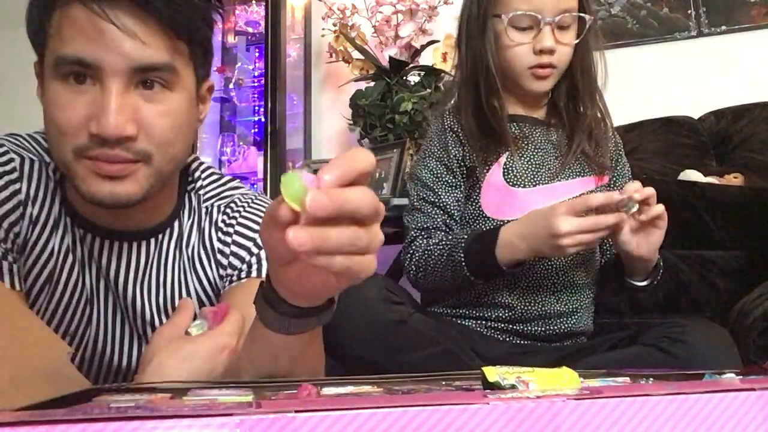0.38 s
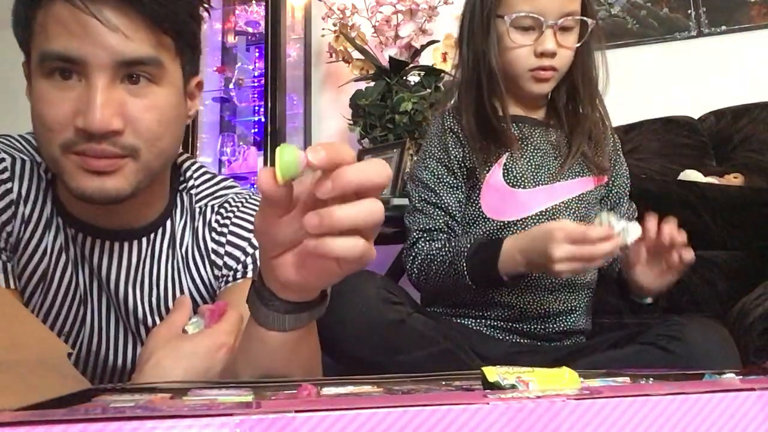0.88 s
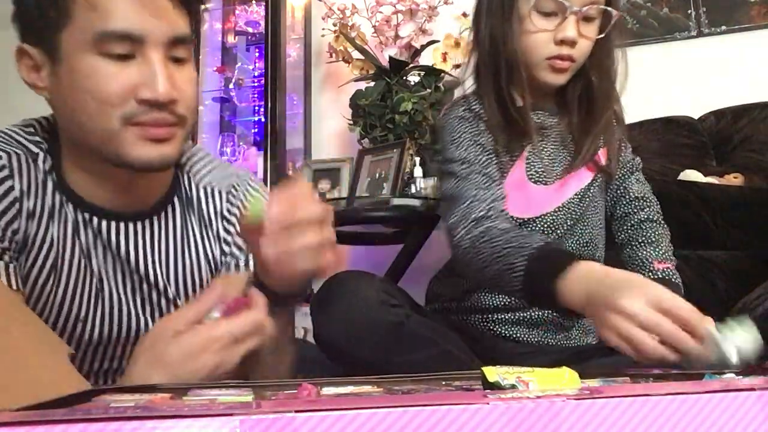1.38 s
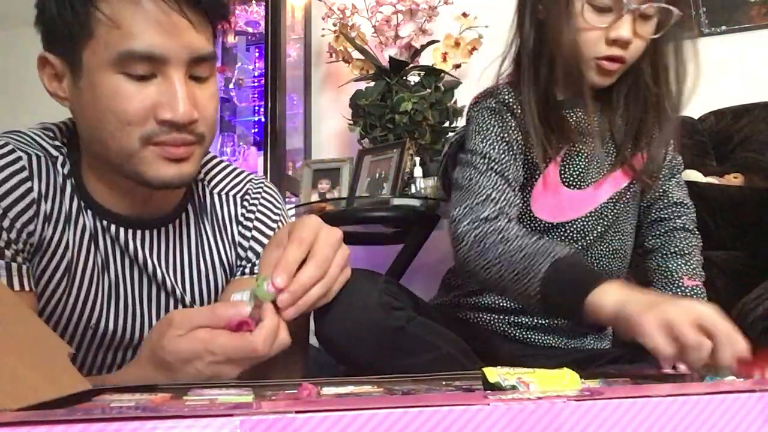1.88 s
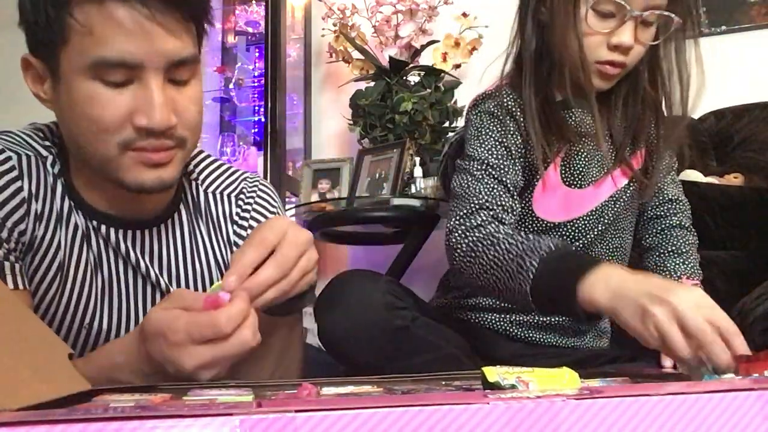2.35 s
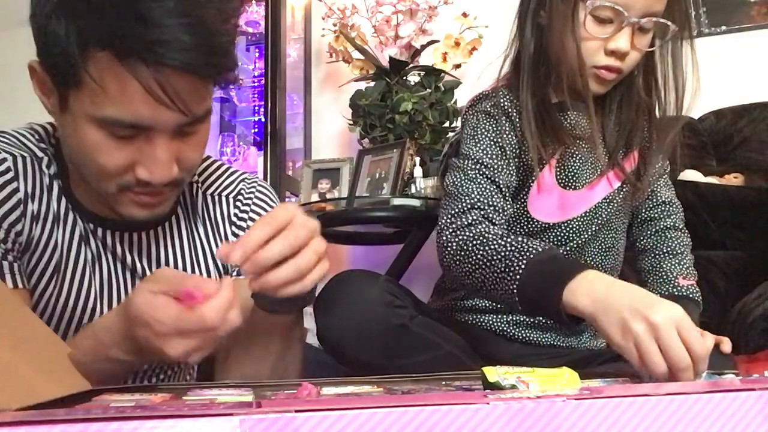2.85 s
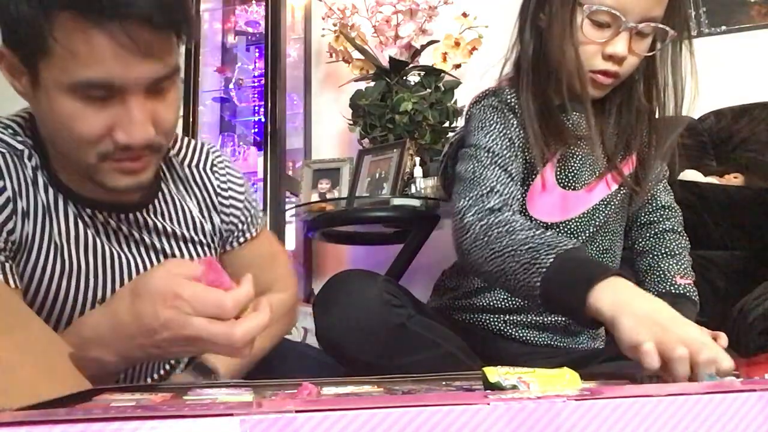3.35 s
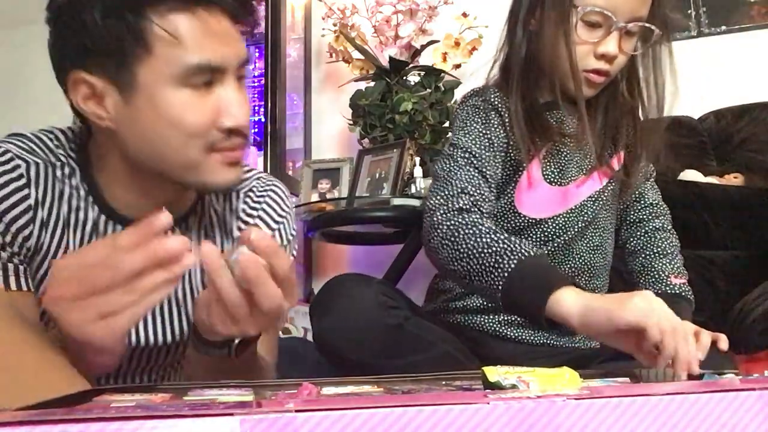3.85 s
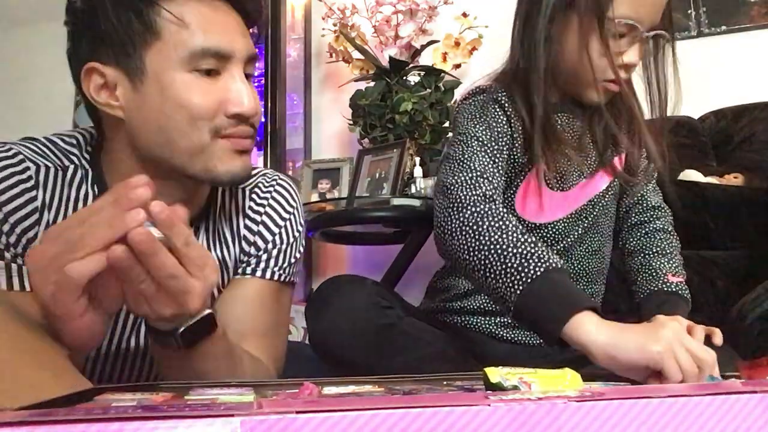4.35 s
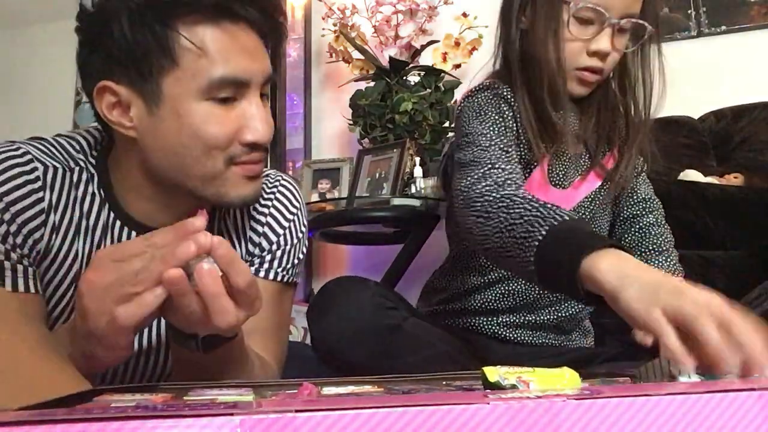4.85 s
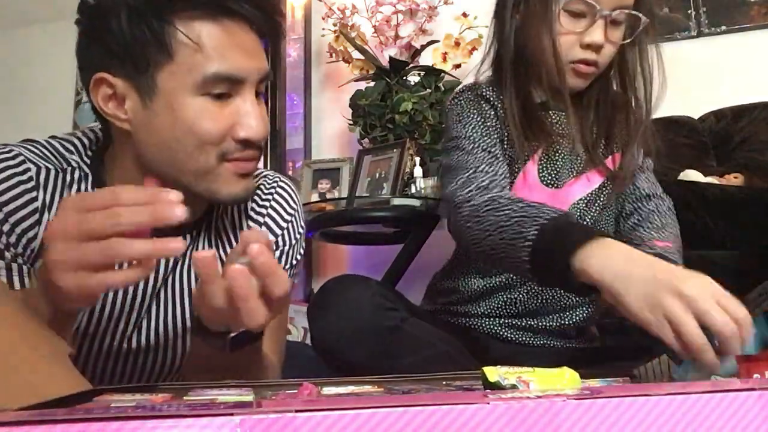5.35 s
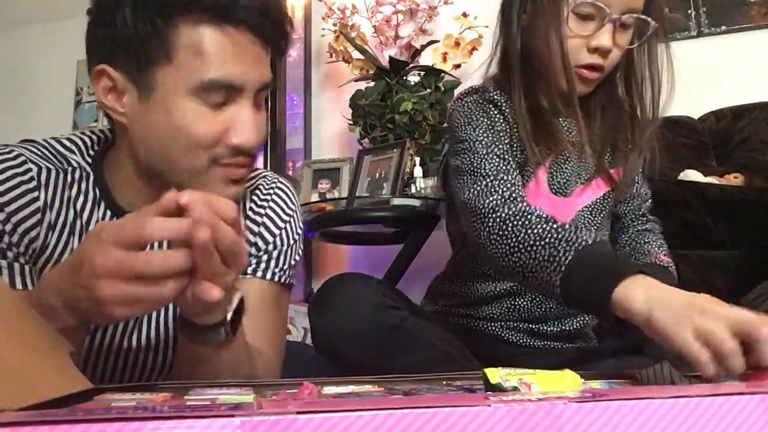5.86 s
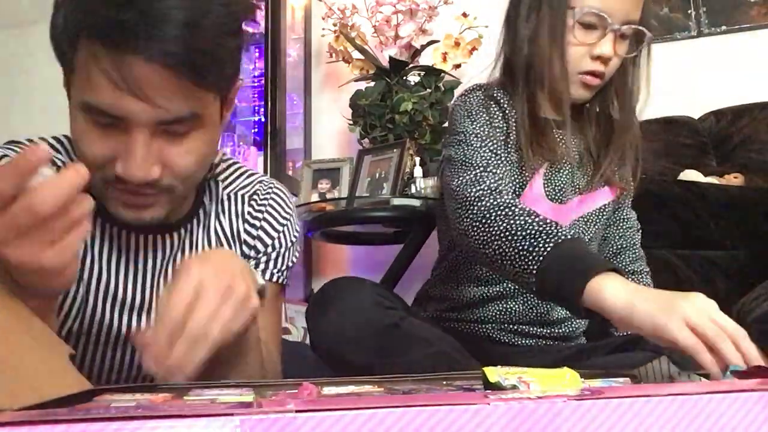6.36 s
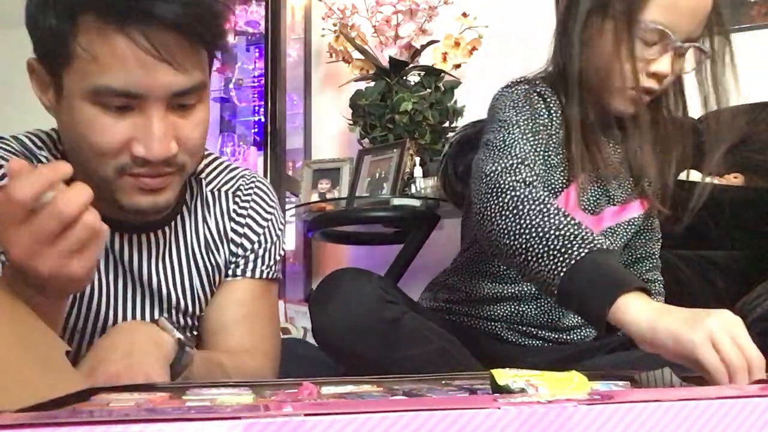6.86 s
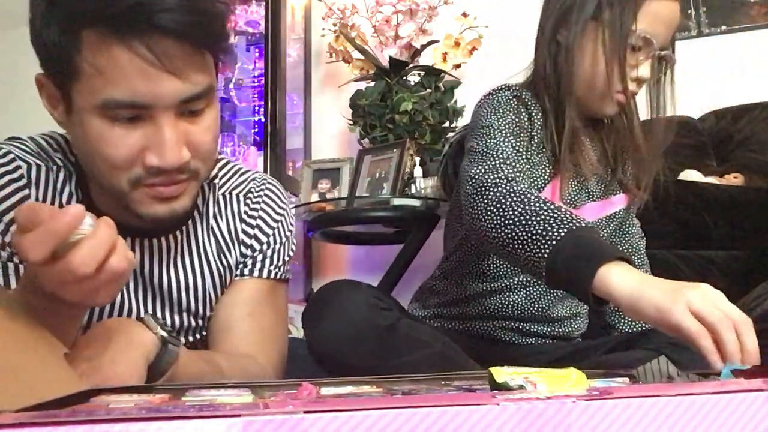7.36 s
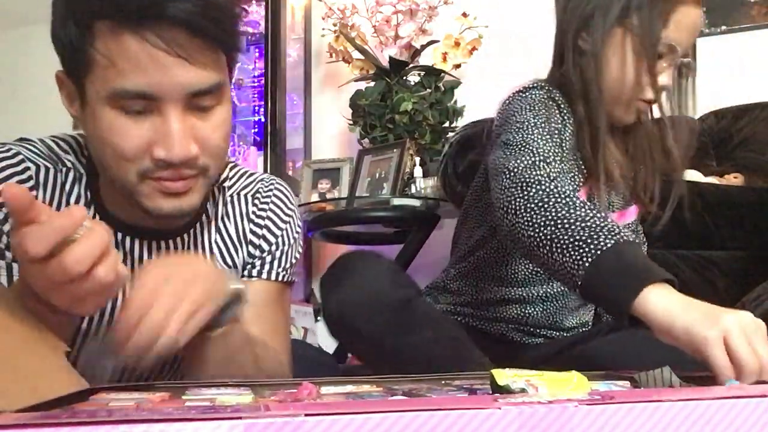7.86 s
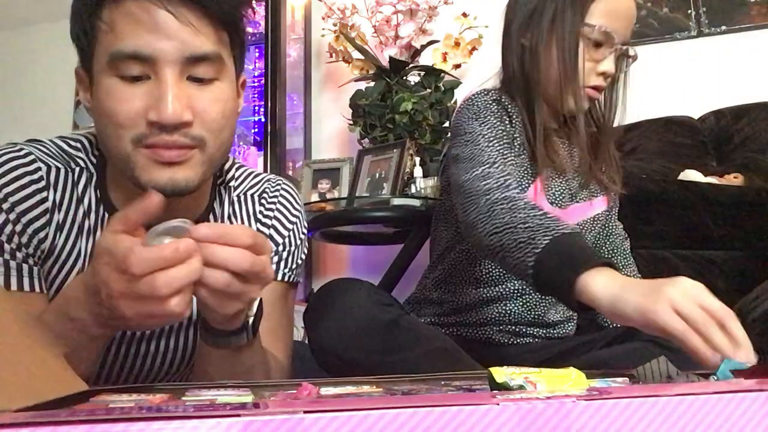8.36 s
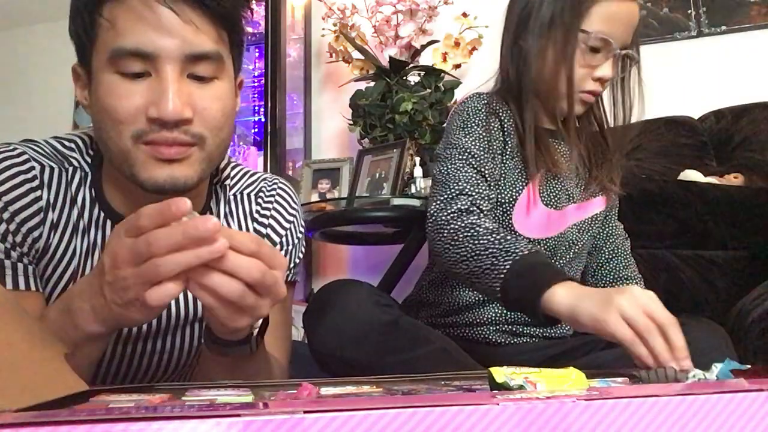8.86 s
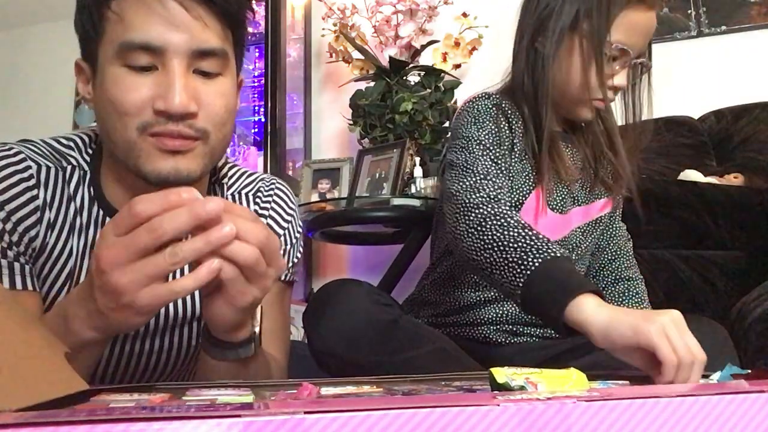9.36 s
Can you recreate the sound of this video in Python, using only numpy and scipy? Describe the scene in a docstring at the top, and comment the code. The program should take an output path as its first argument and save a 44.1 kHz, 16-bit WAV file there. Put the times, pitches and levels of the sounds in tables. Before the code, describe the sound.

Bright film crackle starts sparsely, nearly pauses around one second, then grows into busy snapping and rustling. Fingers bump a thin-walled box, giving low muffled thuds and short rumbling drags. Toward the end there are small gritty plastic scrapes, a quieter gap and final crinkles. Heard close through a modest built-in microphone in a small quiet room.

```python
"""Wrappers rummaged in a thin box

Hands rummage through small foil and plastic wrappers in a thin box, close to a small built-in microphone.
Creases snap one by one as noise bursts under a spectral hump, over a rustle of countless tiny resonant grains.
Touched, the box thumps and rumbles: knocks and small slips drive a bank of modes. Short scrapes are
grainy noise through one gliding resonance. Sparse reflections and steady shaped noise make a quiet room."""
import sys
import numpy as np
from scipy import signal
from scipy.fft import rfft, irfft
from scipy.io import wavfile
from scipy.ndimage import uniform_filter1d

SR = 44100
rng = np.random.default_rng(int(sys.argv[2]) if len(sys.argv) > 2 else 0)


def store_pcm(level_fs):
    """Save levels as 16-bit WAV."""
    pcm = np.round(np.clip(level_fs, -1, 1) * 32767).astype(np.int16)
    wavfile.write(sys.argv[1], SR, np.atleast_2d(pcm).T)


def voltage_ratio(decibels):
    """Convert decibels (scalar or array-like) to amplitude ratios, 20 dB per decade."""
    exponent = np.asarray(decibels, float) / 20
    return 10 ** exponent


N = 417567  # samples


def evened(x):
    """Scales to rms 1."""
    return x / np.sqrt(np.mean(x ** 2) + 1e-20)


def peaked(x):
    """Scales to peak 1."""
    return x / abs(x).max()


def read(points, hz):
    """Reads a spectrum on a log-frequency axis."""
    f, value = np.transpose(points)
    return np.interp(np.log(hz + 1), np.log(f + 1), value)


def add(mix, start_s, sound):
    """Mixes a sound in at start_s, cut at the end of the mix."""
    part = mix[round(start_s * SR):][:len(sound)]
    part += sound[:len(part)]


def causal(gain_db):
    """Minimum-phase response for a gain given from 0 to SR / 2."""
    mirrored_db = np.r_[gain_db, gain_db[-2:0:-1]]
    log_gain = np.log(voltage_ratio(np.maximum(mirrored_db, -100)))
    return np.fft.ifft(np.exp(np.conj(signal.hilbert(log_gain)))).real[:len(gain_db)]


def ring(x, hz, width_hz):
    """A two-pole resonance with gain 1 at its centre."""
    return signal.lfilter(*signal.iirpeak(min(hz, SR / 2.1), hz / width_hz, SR), x)


def stirred(rows, events, after_db, t60_s, stir_bright_db):
    """Level and brightness per sample: the hands' own curve plus a dying stir after each event."""
    row_s, level_db, bright_db = np.transpose(rows)
    t_s, kicks = np.arange(N) / SR, np.zeros(N)
    for start_s, db, *_ in events:
        add(kicks, start_s, voltage_ratio([2 * (db + after_db)]))  # amp of twice the dB is power
    stir = signal.lfilter([1], [1, -voltage_ratio(-2 * 60 / (t60_s * SR))], kicks)
    power = voltage_ratio(2 * np.interp(t_s, row_s, level_db)) + stir
    return 10 * np.log10(power), np.interp(t_s, row_s, bright_db) + stir_bright_db * stir / power


# Film rustle under the hands. Each row: time in seconds, level in dB, brightness in dB per octave.
RUSTLE_CURVE = [(0.0, -56, 1), (0.48, -66.5, -0.5), (1.05, -72.5, 0.5), (1.1, -54.5, 2), (1.17, -49.5, 1.5),
                (1.35, -62, -0.5), (1.55, -54, -4), (2.07, -58.5, -5), (2.3, -53, 0.5), (2.645, -46, 0.5),
                (2.69, -59, 5.5), (2.77, -54.5, -2), (3.08, -52, 3.5), (3.37, -60.5, 1.5), (3.55, -46, 0.5),
                (4.06, -57, -2.5), (4.33, -49.5, -2.5), (5.0, -49.5, 0.5), (5.09, -57, 0.5),
                (5.35, -52.5, 3), (5.375, -61.5, -4), (5.49, -55, -2), (5.54, -47, -6.5), (5.67, -58, -7.5),
                (5.88, -56, -8.5), (6.25, -53.5, -3), (6.44, -72, -11), (6.74, -53, -8), (6.93, -69, -8),
                (6.98, -54, -9), (7.3, -61, -2.5), (7.48, -81, -9.5), (7.79, -63, -4.5), (7.92, -49, -8),
                (8.03, -79, -4), (8.12, -51, -7.5), (8.33, -56, -4.5), (8.45, -67, 1), (8.64, -67, -4.5),
                (8.75, -60, -6), (9.468, -64.5, -8)]


def crumpling():
    """How hard and how bright the film rustles; after a snap it rustles on, duller."""
    return stirred(RUSTLE_CURVE, CREASE_SNAPS, after_db=-25.5, t60_s=0.15, stir_bright_db=-2.5)


# Rustle colour of the film. Each row: frequency in Hz, density in dB per Hz (relative).
FILM_COLOUR = [(850, -18.5), (2000, 2), (3800, 1), (7000, 3.5), (11000, -9), (16000, -12)]


def grains(per_s, spread_db, t60_s, breadth, patchy_db, patches=20):
    """Tiny random creases; each patch of film has its own pitch and is now busier, now stiller."""
    size = voltage_ratio(spread_db * np.minimum(rng.exponential(1, N), 3.5)) * (rng.random(N) < per_s / SR)
    size /= np.sqrt(np.mean(size ** 2) / patches)
    patch = rng.integers(0, patches, N)
    pitches_hz = np.geomspace(850, 15000, patches)
    film = voltage_ratio(read(FILM_COLOUR, pitches_hz)) * np.sqrt(pitches_hz)  # patch width grows with pitch
    level_db, bright_db = crumpling()
    busy = evened(uniform_filter1d(rng.standard_normal((patches, N // 512 + 2)), 5, 1))
    t_s, out = np.arange(512) / SR, np.zeros(N)
    for k, hz in enumerate(pitches_hz):
        at = np.flatnonzero(size * (patch == k))
        busy_db = patchy_db * np.interp(at / 512, np.arange(busy.shape[1]), busy[k])
        rattle = rng.standard_normal(len(t_s)) * voltage_ratio(-60 * t_s / t60_s)
        grain = ring(ring(rattle, hz, breadth * hz), hz, breadth * hz)
        force = np.zeros(N)
        force[at] = size[at] * voltage_ratio(level_db[at] + busy_db + bright_db[at] * np.log2(hz / 4000))
        out += signal.oaconvolve(force, film[k] * grain / np.linalg.norm(grain))[:N]
    return out / np.linalg.norm(film)


def rustle():
    """A dense swish of film sliding on film, wavering fast, and sparser ticks within it."""
    waver = evened(uniform_filter1d(uniform_filter1d(rng.standard_normal(N), 500), 500))
    swish = grains(per_s=3500, spread_db=3.5, t60_s=.005, breadth=.5, patchy_db=5)
    ticks = grains(per_s=600, spread_db=5, t60_s=.005, breadth=.45, patchy_db=4)
    bright_db = crumpling()[1]
    waver_db = (4.5 - 0.4 * bright_db) * waver  # bright foil slides evenly, dull plastic crumples in jerks
    return voltage_ratio(-7.5 + waver_db) * swish + voltage_ratio(-10.0 - 0.033 * bright_db) * ticks


# Modes of the box walls. Each row: frequency in Hz, width in Hz, relative level in dB.
BOX_MODES = [(84.4, 32, -4), (117, 30.5, -1), (165.4, 34.8, 2), (249, 39, 0), (310, 34.5, -0.5),
             (386.4, 110, -0.5), (482, 153, -1), (608, 125, -2.5), (803, 224, -17.5)]


def box(force, weight):
    """The walls ring in their modes, with alternating signs, each driven as weight(hz) says."""
    out = 0
    for k, (hz, width_hz, db) in enumerate(BOX_MODES):
        out = out + (-1) ** k * voltage_ratio(db) * ring(force * weight(hz), hz, width_hz)
    return out


def alike(hz):
    """Weight that drives all modes alike."""
    return 1


# Rubbing on the box. Each row: time in seconds, level in dB, brightness in dB per octave.
RUB_CURVE = [(0.0, -54, 0.9), (0.46, -74, 0), (1.42, -69, -0.5), (1.55, -60, -3.5), (1.92, -54.5, -0.5),
             (2.17, -59, -0.5), (2.67, -66.5, -0.5), (2.82, -47.5, -4), (3.0, -72, 4.5), (3.11, -45, -1.2),
             (3.19, -55, 1), (3.28, -46.5, 0), (3.39, -55.5, 1.5), (3.5, -47, 2), (3.88, -59, -0.5),
             (4.22, -48, 2), (4.31, -58.5, -3.5), (4.4, -55, 4), (5.01, -56, -2.5), (5.08, -76.5, 2),
             (5.36, -74, 3), (5.4, -57, -4), (5.5, -62, -3.5), (5.54, -47, -2.5), (5.75, -63, 1.5),
             (6.07, -59, -0.5), (6.19, -49, 3), (6.38, -61, -1.5), (6.67, -46.5, 0), (6.92, -58, 2.5),
             (6.98, -46, 1), (7.49, -67, -1), (7.61, -47.5, 0), (7.79, -51, 0.5), (8.11, -49.5, 1.5),
             (8.38, -59.5, 0), (8.45, -108, -10), (8.65, -92, 2), (8.7, -62, 0), (9.04, -60.5, 1),
             (9.27, -52.5, 0), (9.468, -57, 1)]


def rubbing(per_s=320, spread_db=3.6, scatter_db_per_octave=2.5, slip_s=.002):
    """Wrappers and fingers drag over the box in small slips, each at another place, duller or brighter."""
    slips = voltage_ratio(spread_db * np.minimum(rng.exponential(1, N), 3)) * (rng.random(N) < per_s / SR)
    place_db = scatter_db_per_octave * np.clip(rng.standard_normal(N), -1.5, 1.5)
    # after a knock the things in the box slide on
    level_db, bright_db = stirred(RUB_CURVE, BOX_KNOCKS, after_db=-11.5, t60_s=0.25, stir_bright_db=-2.5)
    rough = rng.standard_normal(N)

    def spread(x):
        """A slip lasts a moment: decaying noise."""
        return rough * signal.lfilter([1], [1, -np.exp(-1 / (slip_s * SR))], x)

    def mode_force(hz):
        """Slips as one mode feels them."""
        return spread(slips * voltage_ratio(level_db + (bright_db + place_db) * np.log2(hz / 280)))

    sound = box(0.97, mode_force)
    scratch = ring(spread(slips * voltage_ratio(level_db + 2 * bright_db)), 1234, 770)  # dry contact
    sound += voltage_ratio(-13.5) * scratch
    return sound / np.std(box(spread(slips), alike))


# Friction scrapes. Each row: start in seconds, end in seconds, rms level in dB, resonance in Hz,
# width in Hz, glide in octaves.
SCRAPE_STROKES = [(0.0, 0.108, -64, 3250, 500, -0.016), (0.151, 0.29, -62.5, 3300, 500, -0.18),
                  (6.965, 7.04, -44.5, 570, 150, -0.066), (4.869, 5.05, -63, 2120, 300, 0.014),
                  (7.392, 7.463, -74, 11850, 60, -0.18), (8.47, 8.517, -48, 2450, 885, 0.051),
                  (8.525, 8.54, -52.5, 2770, 1200, 0.07), (8.567, 8.579, -56, 2540, 900, 0.017),
                  (8.67, 8.703, -53, 2000, 1300, 0.05), (8.68, 8.754, -55.5, 132, 50, -0.064),
                  (8.859, 8.905, -52.5, 563, 90, -0.023)]


def scrapes():
    """A fingertip on a small plastic shell, or shell on box: grainy friction through one gliding resonance."""
    out = np.zeros(N)
    for start_s, end_s, db, hz, width_hz, glide_octaves in SCRAPE_STROKES:
        slips = rng.standard_normal(round((end_s - start_s) * SR)) ** 3  # cubed: grainy
        path_hz = hz * 2 ** (glide_octaves * np.linspace(0, 1, len(slips)) ** 1.43)
        turn = np.exp(2j * np.pi * np.cumsum(path_hz) / SR)
        r = np.exp(-np.pi * width_hz / SR)
        # shift the resonance to 0 Hz, filter by a double pole, shift back
        smooth = signal.lfilter([1], np.convolve([1, -r], [1, -r]), slips / turn)
        sound = evened((turn * smooth).real)
        add(out, start_s, voltage_ratio(db) * sound * signal.windows.tukey(len(sound), .5))
    return out


# Quiet-room spectrum. Each row: frequency in Hz, relative density in dB per Hz.
AIR_COLOUR = [(30, -50), (60, -2), (115, -0.5), (280, -11), (600, -11.5), (1000, -20), (3000, -16),
              (15500, -32)]


def air(rms_db=-70.5):
    """Steady room tone and microphone hiss: shaped noise."""
    hz = np.fft.rfftfreq(N, 1 / SR)
    return voltage_ratio(rms_db) * evened(irfft(rfft(rng.standard_normal(N)) * voltage_ratio(read(AIR_COLOUR, hz)), N))


def snap(noise, db, hz, breadth, t60_s=0.014, jolt=1.6, soften=.35, rise_s=0.0009, skirt_db=-26):
    """A crease buckles: a jolt and a short rattle, humped around the facet's pitch; weak ones start softer."""
    soft = voltage_ratio(-soften * (db + 25))
    t_s, f = np.arange(len(noise)) / SR, np.linspace(50, SR / 2, 257)
    burst = noise * voltage_ratio(-60 * t_s / t60_s) * (1 - np.exp(-t_s / (rise_s * soft)))
    burst[16] += jolt / soft
    hump = np.exp(-(np.log2(f / hz) / (1.74 * max(breadth, .2))) ** 2)
    hump += voltage_ratio(skirt_db) * f / (f + 900)
    colour = causal(20 * np.log10(hump * np.sqrt(hz / f)))
    return voltage_ratio(db) * peaked(np.convolve(burst, colour))


# Loud crease snaps. Each row: start in seconds, peak in dB, facet pitch in Hz,
# hump breadth (1 is 1.74 octaves from centre to 1/e, floor 0.2).
CREASE_SNAPS = [(0.049, -37.5, 7640, 0.31), (0.105, -31, 3020, 0.16), (0.2923, -41.5, 3360, 0.44),
                (0.589, -28, 6400, 0.82), (0.5986, -34, 4530, 0.34), (0.739, -33.5, 4240.0, 0.7),
                (0.7501, -20, 4940, 0.69), (1.2206, -33.5, 5740, 0.46), (1.511, -23, 5960, 0.92),
                (1.626, -33, 6200, 0.88), (1.688, -18, 2520, 0.91), (1.847, -38.5, 2480, 0.78),
                (1.8612, -18, 6060, 0.55), (1.928, -32, 2480, 1.5), (1.949, -20, 4230, 0.7),
                (2.1975, -30.5, 4340, 0.73), (2.2366, -30.5, 7200, 0.76), (2.367, -36, 6000, 1.5),
                (2.378, -36, 4970, 2), (2.4775, -57, 7850, .5), (2.5247, -16, 7800, 0.79),
                (2.608, -26.5, 4870, 1.37), (2.7632, -32, 2350, 1.6), (2.896, -29.5, 5650, 0.48),
                (2.941, -37, 5000, 1.1), (2.982, -41, 8000, 0.24), (3.0411, -28.5, 3220, 0.94),
                (3.0877, -31, 2400, 0.72), (3.271, -26, 3200, 0.86), (3.412, -31, 3030, 0.78),
                (3.4244, -18, 2920, 0.94), (3.5163, -13.5, 3530, 0.49), (3.598, -34.5, 7840, 0.22),
                (3.632, -37, 7100, .4), (3.6679, -36, 7600, 0.17), (3.738, -31, 2550, 1.25),
                (3.7513, -26, 2500, 0.84), (3.79, -32.5, 7140, 0.26), (3.928, -29, 7200, 0.16),
                (3.947, -32, 3350.0, 1), (4.09, -29.5, 3400, 0.36), (4.1687, -17, 4040, 0.7),
                (4.1874, -30, 4000, 0.37), (4.2042, -21, 5160, 0.59), (4.3257, -30, 5500, 1.4),
                (4.345, -28.5, 6200, 0.63), (4.368, -35.5, 1300, 0.54), (4.549, -18.5, 4140, 0.68),
                (4.5985, -27.5, 6900, 1.1), (4.6461, -26, 4220, 1.1), (4.657, -33, 1400, .6),
                (4.678, -27.5, 2860, 0.8), (4.734, -28, 6840, 1.44), (4.782, -26, 2350, 0.88),
                (4.879, -36, 2610, 0.17), (4.905, -31.5, 8340, 0.18), (5.121, -41.5, 3500, 0.68),
                (5.3842, -32.5, 3940, 0.82), (5.528, -32, 1790, 1.06), (5.564, -31, 3020, 1.26),
                (5.6911, -19, 4450, 0.5), (5.7017, -27, 3060, 1.1), (5.7928, -28.5, 3040, 1),
                (5.9081, -19, 4180, 0.69), (5.9453, -28, 5430, 1.54), (5.9959, -28.5, 2200, 1.5),
                (6.146, -30.5, 1660, 0.88), (6.1805, -23.5, 5140, 0.95), (6.261, -26, 2810, 2),
                (6.296, -35.5, 3020, 1.5), (6.3212, -19.5, 6100, 0.53), (6.472, -31.5, 4930, 0.64),
                (6.5065, -40, 3480, 0.71), (6.525, -16, 2070, 1.07), (6.5326, -28.5, 3250.0, 1),
                (6.548, -28.5, 4700, 0.83), (6.62, -30, 5050, 0.38), (6.658, -30.5, 3870, 0.71),
                (6.745, -37, 2000, 0.6), (6.7795, -36, 2780, 0.63), (6.96, -23.5, 3100, 0.72),
                (7.1058, -28.5, 5030, 0.58), (7.118, -26.5, 4430, 0.23), (7.292, -28.5, 4640, 0.57),
                (7.527, -41, 1820, 0.72), (7.581, -26, 3240, 0.44), (7.588, -28, 2230, 1.13),
                (7.6938, -20, 3700, 0.82), (7.809, -30, 1680, 1.15), (7.825, -32, 1500, 1.1),
                (7.843, -36, 2170, 0.89), (7.897, -27, 6350, 0.51), (7.96, -30.5, 1550, 1.2),
                (7.98, -32, 1390, 1.3), (8.0, -33, 1990, 1.4), (8.0487, -31.5, 1530.0, 0.53),
                (8.0858, -28.5, 2050, 0.99), (8.1487, -33, 2500, 1.6), (8.163, -27, 5270, 0.58),
                (8.195, -31, 3120, 0.18), (8.234, -34, 1620, 0.5), (8.2566, -40, 9000, 1.7),
                (8.279, -30, 3430, 1.65), (8.3326, -45, 7640, 0.48), (8.3605, -23, 7300, 0.86),
                (8.3615, -27.5, 2400, 0.16), (8.378, -31, 4630, 0.26), (8.7324, -29.5, 7500, 0.28),
                (8.734, -24.5, 2740, 0.31), (8.7496, -44, 3220, 0.67), (8.838, -44, 2250, 0.98),
                (8.924, -40, 1320, 0.32), (9.027, -36.5, 2640, 0.54), (9.1074, -21, 3820, 1.1),
                (9.1678, -35, 3300, 0.44), (9.197, -32, 2350, 0.42), (9.2065, -29.5, 3500, 0.75),
                (9.254, -33, 1420, 0.87), (9.3267, -32, 3080, 0.57), (9.339, -28, 3390.0, 0.51),
                (9.3457, -31.5, 1970, 1.23), (9.3918, -28, 3370, 0.37)]


def snaps():
    """The loud creases, each with its own noise."""
    out, noise = np.zeros(N), rng.standard_normal((len(CREASE_SNAPS), 768))
    for z, (start_s, db, hz, breadth) in zip(noise, CREASE_SNAPS):
        add(out, start_s, snap(z, db, hz, breadth))
    return out


# Knocks on the box. Each row: start in seconds, peak of the thump in dB, main pitch in Hz.
BOX_KNOCKS = [(1.482, -47, 505), (1.6866, -29.5, 343), (1.9483, -29.5, 276), (2.003, -37, 248),
              (2.375, -42.5, 322), (2.699, -44.5, 227), (2.754, -44, 300), (2.801, -41, 148),
              (2.818, -39.5, 160), (2.936, -44.5, 556), (3.2711, -37, 380), (3.4694, -30.5, 282),
              (4.4516, -37, 427), (4.5468, -25, 365), (4.556, -32.5, 112), (4.7815, -38.5, 443),
              (5.384, -44.5, 394), (5.514, -40, 350), (5.5593, -36.5, 268), (5.7018, -35, 330),
              (5.7907, -32, 374), (5.914, -39.5, 490), (5.9517, -35.5, 407), (6.1832, -39.5, 310.0),
              (6.5252, -41, 437), (6.6501, -39, 232), (6.668, -36, 87.6), (6.679, -37, 84),
              (6.754, -35, 428), (6.804, -37.5, 434), (6.827, -33.5, 500), (6.8431, -36.5, 435),
              (6.9585, -34, 560), (7.732, -37, 330), (7.8093, -33, 476), (7.8739, -34, 466),
              (8.0494, -32.5, 378), (8.0861, -32, 507), (8.676, -45.5, 250), (9.254, -36.5, 362)]


def knocks():
    """A short uneven push favours the modes near the pitch of its place, with a dry tick of contact."""
    out, noise = np.zeros(N), rng.standard_normal((len(BOX_KNOCKS), 4096))
    t_s = np.arange(noise.shape[1]) / SR
    for z, (start_s, db, pitch_hz) in zip(noise, BOX_KNOCKS):
        push = z * voltage_ratio(-60 * t_s * pitch_hz / 6)  # 60 dB in 6 cycles: low knocks push longer

        def near_pitch(hz):
            """Weight that falls off away from the knock's pitch."""
            return 1 / (1 + (np.log(hz / pitch_hz) / 0.82) ** 2) ** 2

        add(out, start_s, voltage_ratio(db) * peaked(box(push, near_pitch)))
        add(out, start_s, snap(z[:768], db - 0.5, 6 * pitch_hz, 1.17))
    return out


# Reverberation. Each row: frequency in Hz, t60 in seconds.
ROOM_DECAY = [(300, 0.17), (1400, 0.093), (3700, 0.24), (9700, 0.24), (15000, 0.16)]


def room(x, tails=3, level_db=-9.5):
    """Sparse reflections dying by band; several tails take turns so that like snaps differ."""
    out, t_s = np.zeros(N), np.arange(N) / SR
    for k in range(tails):
        taps = np.zeros(SR // 3)
        at = np.arange(160, len(taps) - 20, 20)
        taps[at + rng.integers(0, 20, len(at))] = rng.choice([-1., 1.], len(at))
        hz, frame_s, z = signal.stft(taps, SR, nperseg=128)
        decay = voltage_ratio(-60 * frame_s / read(ROOM_DECAY, hz)[:, None])
        tail = signal.istft(z * decay, SR, nperseg=128)[1]
        turn = np.sqrt(2 / tails) * np.cos(np.pi * (3.1 * t_s + k / tails))
        out += signal.oaconvolve(x * turn, tail / np.linalg.norm(tail))[:N]
    return voltage_ratio(level_db) * out


def scene():
    """Film, shell and box with their reflections; film sounds also jolt the box they lie in."""
    film = snaps() + rustle()
    near = film + voltage_ratio(13.0) * box(film, alike) + scrapes() + knocks() + rubbing()
    out = near + room(near)
    add(out, 0.0115, voltage_ratio(-15) * film)  # one clear echo from a near wall
    return out[None]


def top_cut(x):
    """Nothing passes above the cut-off."""
    return signal.sosfilt(signal.butter(12, 16800, fs=SR, output="sos"), x)


# Microphone housing resonances and dips. Each row: frequency in Hz, width in Hz, gain in dB.
HOUSING = [(1500, 210, 2), (2400, 3300, -3), (3836, 850, 6.5), (4394, 1100, -8.5), (7350, 600, 1),
           (9680, 330, 4), (12100, 270, 2.5), (14100, 760, 0)]


def record(dry):
    """The housing colours the sound and cuts the deep bass; a steep 16 kHz band limit; room tone and hiss."""
    hz = np.linspace(0, SR / 2, 4097)
    colour_db = sum(db / (1 + (2 * (hz - f) / width_hz) ** 2) for f, width_hz, db in HOUSING)
    bass_cut_db = -10 * np.log10(1 + (70 / (hz + 1)) ** 6)
    band_limit_db = -25 / (1 + np.exp((16000 - hz) / 60))  # a step down of 25 dB
    heard = signal.oaconvolve(dry[0], causal(colour_db + bass_cut_db + band_limit_db))[:N] + air()
    return top_cut(heard[None])


dry = scene()
out = record(dry)
store_pcm(out)
```